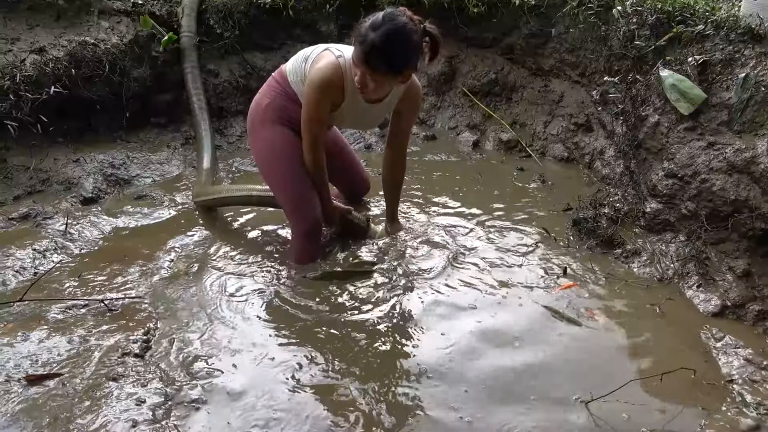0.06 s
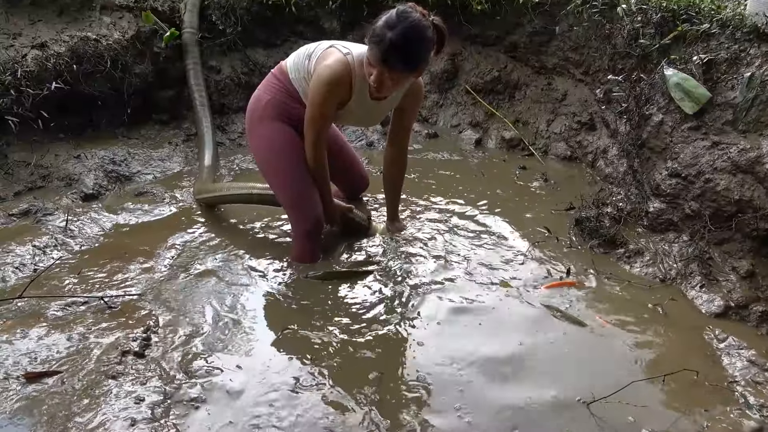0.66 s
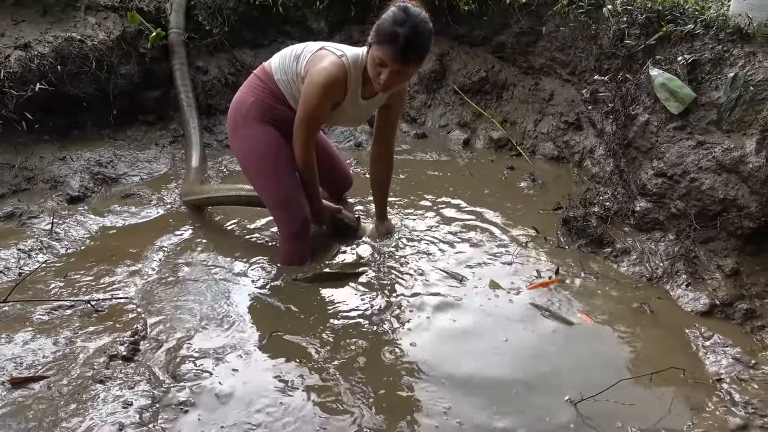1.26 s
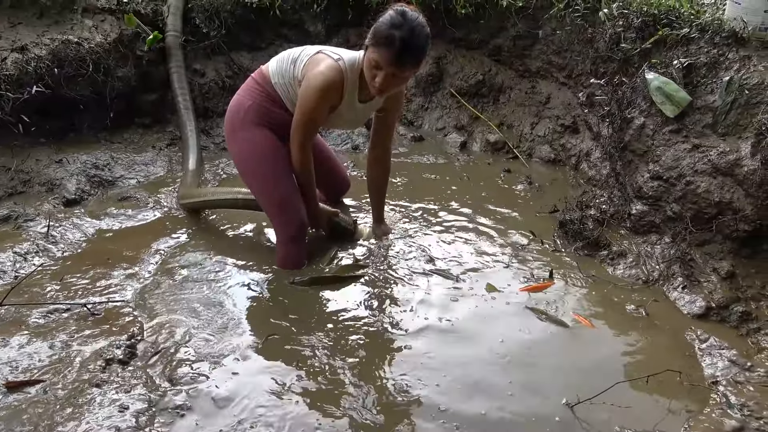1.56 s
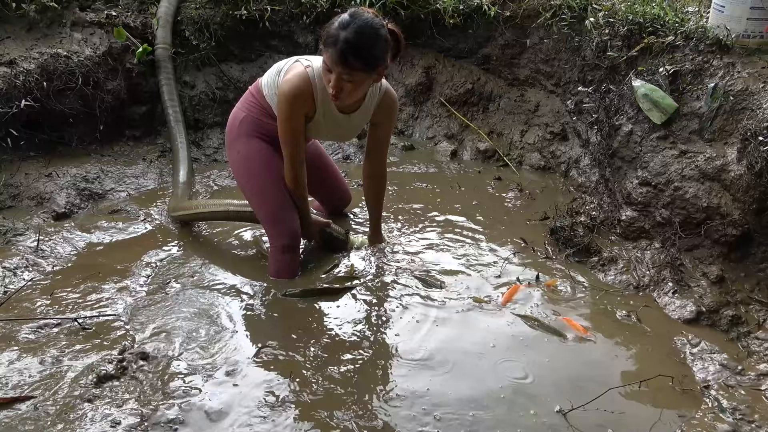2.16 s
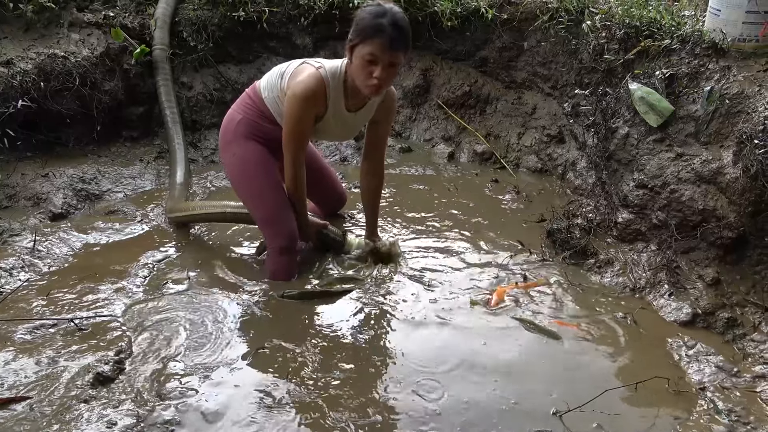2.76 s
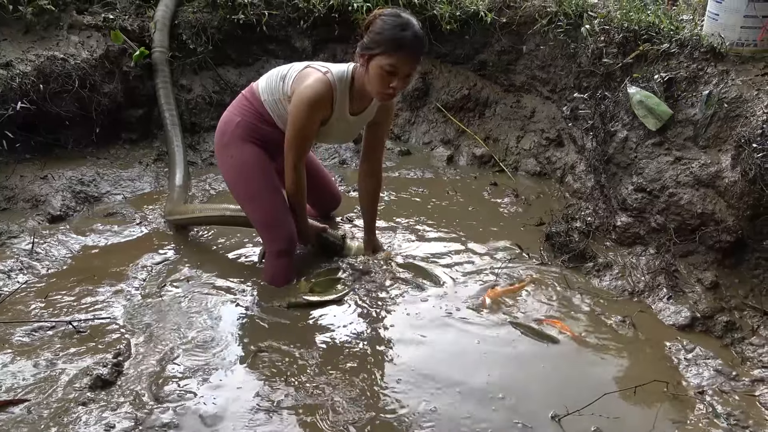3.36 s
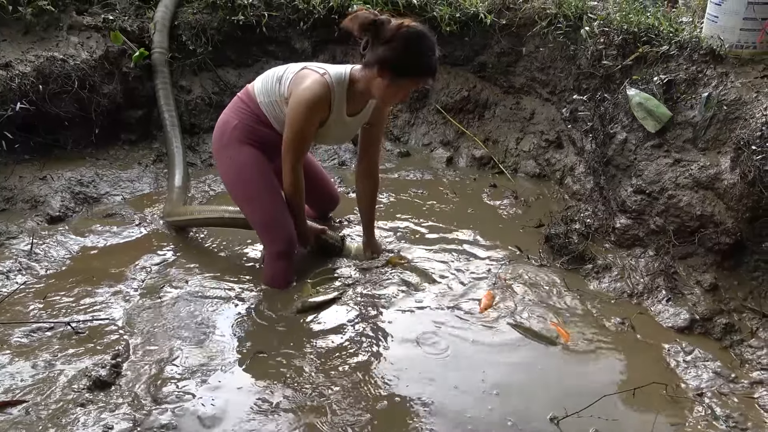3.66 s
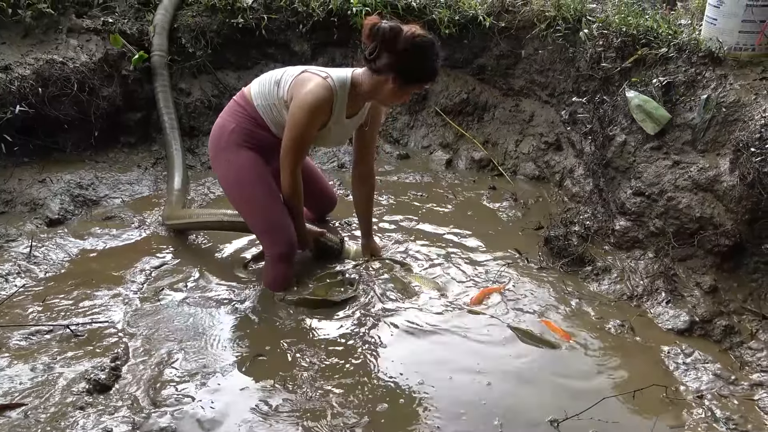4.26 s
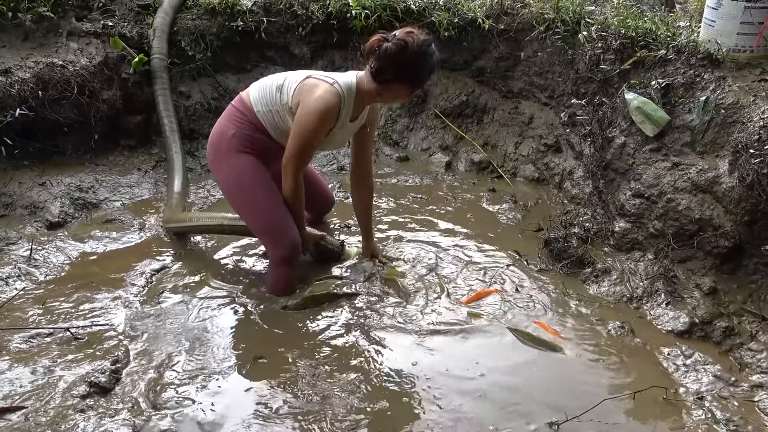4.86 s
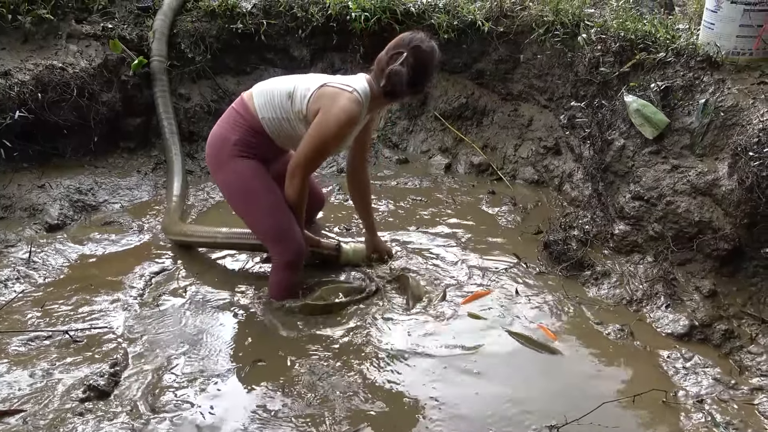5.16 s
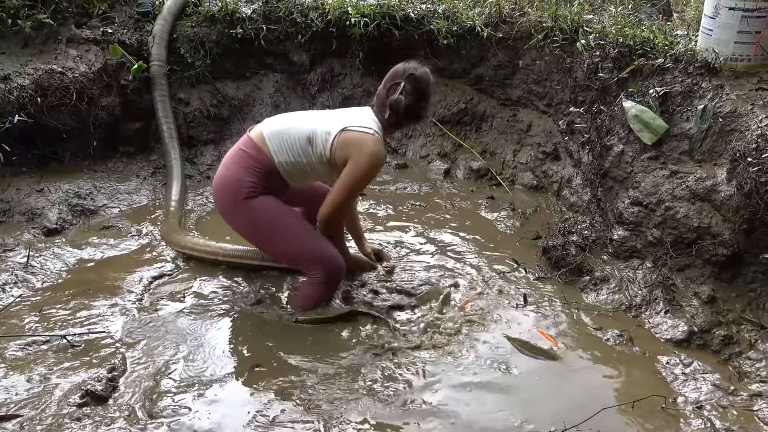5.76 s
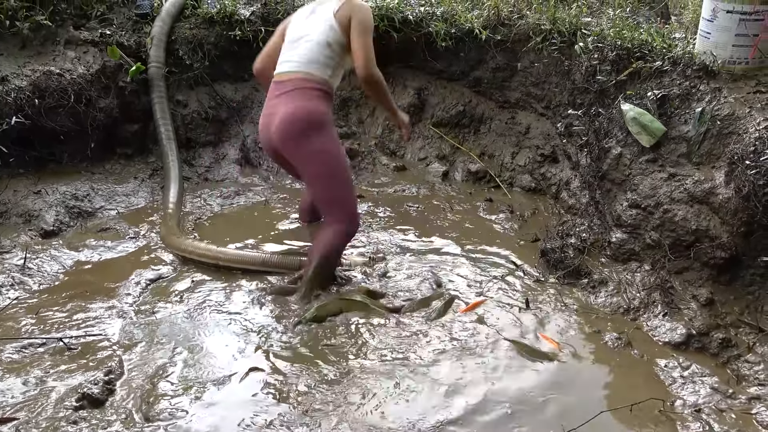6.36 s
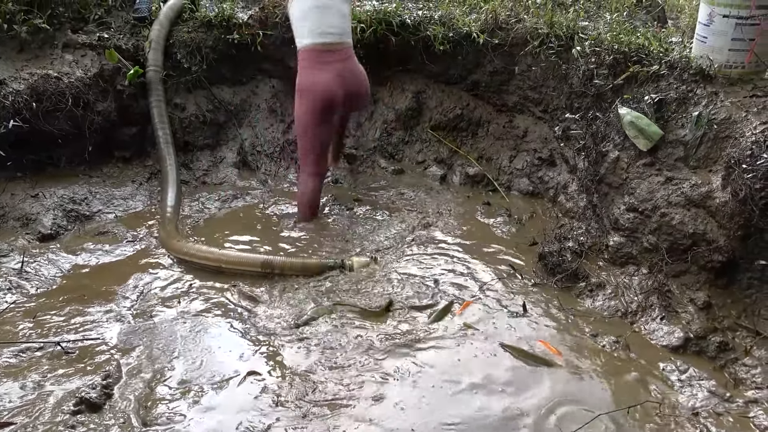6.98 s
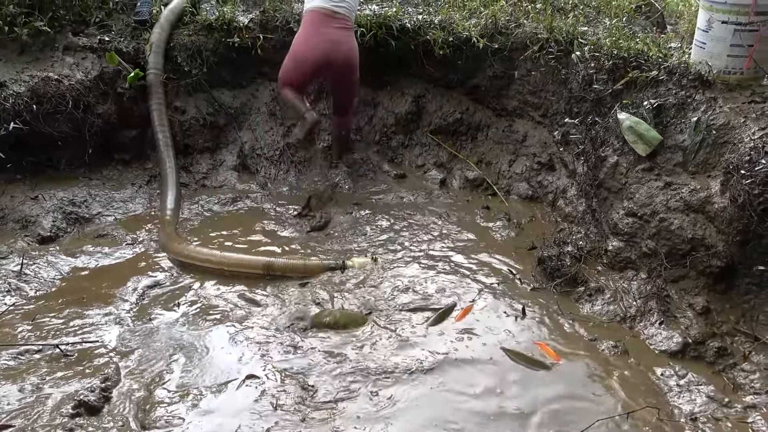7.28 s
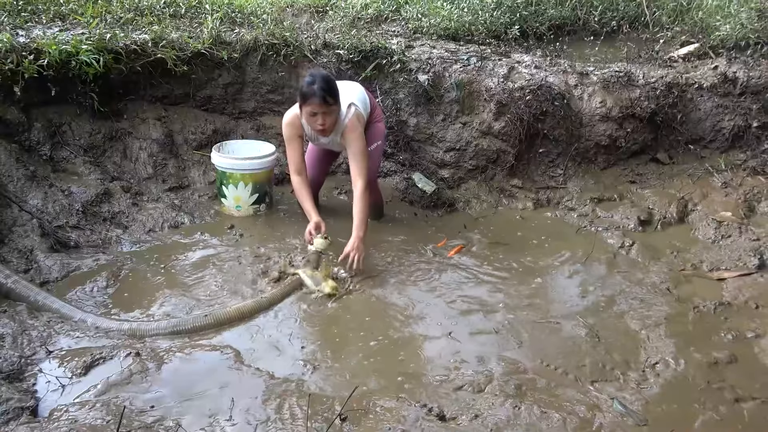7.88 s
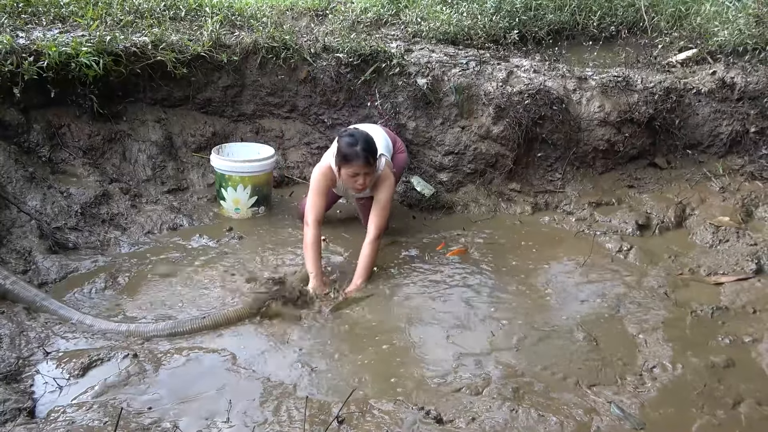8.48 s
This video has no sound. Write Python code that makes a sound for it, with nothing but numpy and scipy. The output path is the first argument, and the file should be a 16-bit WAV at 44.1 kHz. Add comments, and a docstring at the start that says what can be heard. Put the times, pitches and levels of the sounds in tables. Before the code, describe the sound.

From the start, a small single-cylinder engine driving a water pump runs steadily outdoors, heard nearby. It chugs at a fast idle, with low exhaust puffs, a knocking body, rattling metal and a sharp hiss on every beat. At about 2.2 seconds a faint, short hoot rises and falls behind it. The engine swells slightly around 5 seconds and settles, then speeds up from about 5.7 to 6.5 seconds. It stays fast, clattering harder, while the hiss becomes a more even rush. A thin, faint whine creeps in after 7 seconds. At about 7.9 seconds the engine cuts off abruptly. Faint outdoor air and a few small wet smacks follow. From about 8.3 to 8.7 seconds hands slosh in shallow muddy water, with gurgles, slaps, light spray and ringing bubbles, all quieter than the engine.

```python
"""Pump engine by a muddy pond

A small single-cylinder four-stroke drives a water pump: exhaust puffs, a knocking block, rattling metal.
It chugs slowly with a sharp hiss in every cycle, then speeds up, clatters harder, and the hiss thins
to a more even rush. A faint hoot passes behind it. The engine sound breaks off, and hands slosh in
the shallow mud with wet slaps, spray and ringing bubbles, over faint outdoor air."""
import sys
import numpy as np
from scipy import signal
from scipy.fft import rfft, irfft, next_fast_len
from scipy.io import wavfile
from scipy.ndimage import uniform_filter1d

SR = 44100
rng = np.random.default_rng(int(sys.argv[2]) if len(sys.argv) > 2 else 0)


def unload_wav(signal):
    """Save mono or channel-first audio to the path in sys.argv[1] as 16-bit WAV at rate SR, clipped to [-1, 1]."""
    wavfile.write(
        sys.argv[1],
        SR,
        np.round(np.clip(np.atleast_2d(signal).T, -1, 1) * 32767).astype(np.int16),
    )


N = 384993
T = np.arange(N) / SR
ENGINE_END_S = 7.874

# engine tone at idle and at full speed: multiple of the firing rate, relative_db
SLOW_ORDERS = [(1, -20.5), (2, -3.5), (3, -9), (4, -7), (5, -2), (6, 3.5), (7, -10.5), (8, -14.5), (9, -22),
               (10, -16), (11, -16.5), (12, -21), (13, -24), (14, -18), (15, -9), (16, -40.5), (17, -22.5),
               (18, -14.5), (19, -12), (20, -12), (21, -0.5), (22, -13), (23, -10), (24, -27), (25, -6.5),
               (26, -19)]
FAST_ORDERS = [(1, -16), (2, -4), (3, -8.5), (4, -4.5), (5, 2), (6, -11), (7, -22.5), (8, -18), (9, -16.5),
               (10, -24), (11, -10.5), (12, -12), (13, -28), (14, -9), (15, -13), (16, -14), (17, -7),
               (18, -8), (19, -12), (20, -12), (21, -25), (22, -21), (23, -18), (24, -39), (25, -50),
               (26, -29), (27, -21), (28, -9.5), (29, -22), (30, -10.5), (31, -8), (32, -8.5), (33, -11.5),
               (34, -9.5), (35, -15), (36, -16), (37, -19), (38, -17)]
# narrow ringing peaks and dips in the engine's hiss and rattle: centre_hz, width_hz, lift_db
ENGINE_RESONANCES = [(1088.6, 30, 8), (1317, 36, 6), (1686, 96, -4.5), (2027, 230, 2.5), (2410, 40, -1),
                     (2847, 29, 6), (3520, 104, 5.5), (3700, 110, -5.5), (4470, 71, 2.5), (4760, 86, 7),
                     (4834, 89, -6.5), (6030, 140, 3.5), (6650, 64, 5), (7600, 160, 4), (8480, 200, 2.5),
                     (8700, 78, 8), (10800, 550, 1.5)]
# colour of flying water: frequency_hz, gain_db
SPRAY_COLOUR = [(1200, -11), (2000, -2), (2800, -1.5), (4000, -3.5), (6000, -5), (8000, -8.5), (12000, -18),
                (15500, -27)]


def engine():
    """The turning crank times every layer; speed crossfades them from chugging to racing."""
    # idle, a brief swell, then the throttle opens: time_s, firing_rate_hz
    speed_curve = [(0, 30.593), (.403, 30.978), (1.329, 31.189), (2.338, 30.821), (2.745, 31.07),
                   (4.475, 30.601), (5.022, 32.925), (5.658, 30.888), (6.138, 40.39), (6.474, 43.37),
                   (6.875, 42.676), (7.87, 42.437)]
    speed = np.interp(T, *np.transpose(speed_curve))
    racing, rough = effort(speed)
    slow, fast = np.sqrt(1 - racing), np.sqrt(racing)
    turn = np.cumsum(speed) / SR + .0022 * drift(10)   # in cycles; no two last quite as long

    def fader(idle_db, full_db, rough_db):
        return from_db(idle_db + (full_db - idle_db) * racing + rough_db * rough)

    mix = fader(-24, -19.5, -1.5) * exhaust(turn, slow, fast) * balance(.7, -.8)
    mix += fader(-26.5, -26.5, 1) * knock(turn, slow, fast, rough) * balance(-.5, .5)
    mix += fader(-26, -21.5, -1) * rattle(turn, slow, fast)
    mix += fader(-27.5, -20, 0) * hiss(turn, slow, fast) * balance(.5, -.5)
    mix += rough * slow * growl(turn) + whine(turn)
    return mix * np.clip((ENGINE_END_S - T) * 500, 0, 1)


def effort(speed, idle_hz=31, full_hz=42.5, lag_s=.062):
    """Racing and roughness, both 0-1: the roar lags the speed, and speed changes make firing uneven."""
    racing = np.clip((speed - idle_hz) / (full_hz - idle_hz), 0, 1) ** 1.77
    pole = np.exp(-1 / (lag_s * SR))
    racing = signal.lfilter([1 - pole], [1, -pole], racing)
    change_hz_per_s = uniform_filter1d(np.abs(np.gradient(speed)) * SR, size=SR // 4)
    return racing, np.clip(.012 + .098 * np.sqrt(np.abs(change_hz_per_s)), 0, 1)


def exhaust(turn, slow, fast):
    """The low orders: one puff from the silencer per cycle."""
    chug = pulses(turn, SLOW_ORDERS[:9], place=.76)
    race = pulses(turn, FAST_ORDERS[:9], place=.68)
    puffs = slow * chug + fast * race
    levelled = puffs / np.sqrt(uniform_filter1d(puffs ** 2, size=8000))
    return levelled * from_db(.5 * drift(30))


def knock(turn, slow, fast, rough):
    """The middle orders: the block rings after each blow, with a second, higher ring at speed."""
    turn = turn + .009 * rough * slow * drift(60)
    chug = pulses(turn, SLOW_ORDERS[9:], place=.17)
    chug = signal.sosfilt(signal.butter(8, 750, fs=SR, output="sos"), chug)
    race = pulses(turn, FAST_ORDERS[9:26], place=.47)
    bark = pulses(turn, FAST_ORDERS[26:], place=.78)
    ring = from_db(1.5) * slow * chug + fast * (from_db(.5) * race + from_db(-.5) * bark)
    return ring * from_db((.5 + 2.7 * rough) * drift(45))


def rattle(turn, slow, fast):
    """The engine rattles in three noisy bursts a cycle, with metal clatter on top."""
    # rattle colour at idle and at full speed: frequency_hz, gain_db
    slow_colour = [(40, -24), (180, -2), (300, -8.5), (520, -7.5), (700, 2.5), (920, -3), (1100, -1.5),
                   (1350, 2.5), (1720, -5), (2100, -1), (3200, 0), (4500, -3.5), (12000, -15)]
    fast_colour = [(40, -20), (200, -3), (350, 1), (520, -1.5), (730, 10), (1000, -5.5), (1220, 3),
                   (1400, 4.5), (1720, 3.5), (2300, -0.5), (3200, -16), (3800, -41), (12000, -26)]
    # rattle rhythm at idle and at full speed: place_in_cycle, relative_db, decay_cycles
    slow_bursts = [(0.64, -3, 0.26), (.93, 3.5, 0.13), (0.22, -12, 0.2)]
    fast_bursts = [(0.49, -3, 0.11), (0.72, -11, 0.13), (0.041, -6.5, 0.16)]
    chug = noise(slow_colour, ENGINE_RESONANCES)
    chug *= bursts(turn, slow_bursts, rise=.02, floor_db=-7, uneven_db=4)
    race = noise(fast_colour, ENGINE_RESONANCES)
    race *= bursts(turn, fast_bursts, rise=.013, floor_db=-11, uneven_db=6)
    metal = clatter(turn)
    return (slow * (from_db(1) * chug + from_db(-4.5) * metal)
            + fast * (from_db(-7) * race + from_db(-2.5) * metal))


def clatter(turn, ring_t60_s=.063, slack_s=.00003, uneven_db=2.5):
    """Metal parts meet at set places in the cycle; each contact rings in its own way."""
    # valve gear and piston contacts: place_in_cycle, relative_db
    contacts = [(.09, 12), (0.349, 2), (.52, 2.5), (0.752, 4.5), (.81, 3), (0.932, 4.5)]
    # colour of the struck metal: frequency_hz, gain_db
    metal_colour = [(300, -22), (800, -2.5), (1100, -1.5), (1400, 5.5), (1750, -10), (2350, -0.5),
                    (3300, -13), (3900, -6.5), (6000, -14.5), (9000, -14), (15000, -33)]
    metal, age = 0, T[:SR // 20]
    for place, db in contacts:
        due = np.flatnonzero(np.diff(np.floor(turn - place)) > 0)
        late, strength = rng.standard_normal((len(due), 2)).T
        hits = np.clip(due + np.round(late * slack_s * SR).astype(int), 0, N - 1)
        clicks = np.zeros(N)
        clicks[hits] = from_db(db + uneven_db * strength)
        ring = rng.standard_normal((2, len(age))) * from_db(-60 * age / ring_t60_s)
        metal = metal + signal.oaconvolve(clicks[None], ring, axes=1)[:, :N]
    return coloured(metal, metal_colour, ENGINE_RESONANCES)


def hiss(turn, slow, fast):
    """Sharp spits of gas at idle give way to a more even rush at speed."""
    # colour of the idle jet and of the fast rush: frequency_hz, gain_db
    jet_colour = [(1500, -45), (2100, -26), (3400, -24), (3800, -12.5), (4500, 3.5), (6000, 2.5),
                  (8000, 3.5), (8800, -1), (9400, -2), (11000, -2), (13500, -6.5), (15800, -41)]
    rush_colour = [(1760, -8.5), (3000, 1), (3700, -6), (4220, -21.5), (4580, -2.5), (5090, -4), (5490, -2),
                   (6910, -2.5), (9320, -14.5), (13200, -13), (15800, -30)]
    # a sharp spit and a softer breath: place_in_cycle, relative_db, decay_cycles
    jet_bursts = [(0.651, 3.5, 0.12), (.97, -10, 0.32)]
    jet = rms_one(np.tanh(noise(jet_colour, ENGINE_RESONANCES) / 2))   # hard and dense, few stray peaks
    jet *= bursts(turn, jet_bursts, rise=.025, floor_db=-17, uneven_db=1.8)
    rush = noise(rush_colour, ENGINE_RESONANCES)
    rush *= bursts(turn, [(.69, 0, .11)], rise=.031, floor_db=-7, uneven_db=-5)
    return from_db(2.53) * slow * jet + from_db(-7) * fast * rush


def growl(turn):
    """The hollow growl of uneven firing: one throb of low noise per cycle."""
    # hollow colour: frequency_hz, gain_db
    growl_colour = [(230, -43), (340, -10), (430, 10), (520, -3), (620, 1), (850, -35)]
    hollow = from_db(-24.5) * noise(growl_colour)
    return hollow * bursts(turn, [(.8, 0, .19)], rise=.05, floor_db=-20, uneven_db=-5.5)


def whine(turn, order=74, level_db=-37.5, start_s=7.1, fade_s=.4):
    """A thin tone locked to the shaft creeps in near the end of the run."""
    fade_in = np.clip((T - start_s) / fade_s, 0, 1)
    return fade_in * from_db(level_db) * rms_one(np.sin(2 * np.pi * order * turn))


def sloshing():
    """Hands stir the shallows into gurgle and spray; between strokes the water laps and trickles."""
    # hand strokes: peak_s, gurgle_db, spray_db
    hand_strokes = [(8.265, -44, -39), (8.338, -31.5, -32), (8.408, -42, -34), (8.442, -26, -30.5),
                    (8.495, -26, -33), (8.542, -28, -41), (8.598, -34, -41), (8.622, -31, -36),
                    (8.73, -44, -31)]
    # colour of stirred water: frequency_hz, gain_db
    gurgle_colour = [(90, -45), (170, -24), (330, -11), (520, -17), (750, 2), (1000, -1), (1350, -9),
                     (1700, -2), (2000, -18), (2600, -8), (3900, -32)]
    peak_s, gurgle_db, spray_db = np.transpose(hand_strokes)
    gurgle = coloured(grains(per_s=900, spread_db=-1.5), gurgle_colour)
    spray = coloured(grains(per_s=2200, spread_db=2.5), SPRAY_COLOUR)
    return (gurgle * strokes(peak_s, gurgle_db, settle_s=.049, floor_db=-55)
            + spray * strokes(peak_s, spray_db, settle_s=.058, floor_db=-53.5))


def strokes(peaks_s, levels_db, settle_s, floor_db, swell_s=.0095):
    """Envelope of the hand strokes: each swells quickly, then the water settles."""
    power = from_db(floor_db) ** 2
    for peak_s, db in zip(peaks_s, levels_db):
        swell = np.exp(np.minimum(T - peak_s, 0) / swell_s)
        settle = np.exp(-np.maximum(T - peak_s, 0) / settle_s)
        power = power + (from_db(db) * swell * settle) ** 2
    return np.sqrt(power)


def bubbles(ring_cycles=25, swell_s=.0015):
    """Trapped air rings; a bubble that climbs to the surface rises in pitch and rings longer."""
    # the larger bubbles: start_s, relative_db, pitch_hz, rise as a share of the pitch
    plops = [(7.96, -30, 1300, 1.0), (8.33, -17, 710, .11), (8.361, -15.5, 1730, .1),
             (8.408, -19, 2930, .1), (8.438, -8.5, 1110, 0.054), (8.474, -13, 1020, .05),
             (8.481, -8, 943, .05), (8.487, -11, 990, .1), (8.498, -21.5, 340, .02), (8.511, -18, 826, .1),
             (8.516, -16.5, 2750, .1), (8.534, -12, 780, .05), (8.619, -14.5, 770, 0.043),
             (8.649, -23, 3200, .05)]
    track, age = np.zeros(N + SR), T[:SR // 10]
    for start_s, db, pitch_hz, rise in plops:
        life = age * pitch_hz / (ring_cycles * (1 + 4 * rise))
        glide_hz = pitch_hz * (1 + rise * (2 * np.minimum(life, 1) - .4))
        envelope = from_db(-60 * life) * (1 - np.exp(-(age / swell_s) ** 2))
        ring = np.sin(2 * np.pi * np.cumsum(glide_hz) / SR) * envelope
        track[round(start_s * SR):][:len(age)] += from_db(db) * ring / np.abs(ring).max()
    return track[:N]


def slaps(crack_s=.0016, tail_s=.015, tail_db=-8.5):
    """Wet mud smacks: a short crack with a tail of spray."""
    # smacks on the mud: start_s, relative_db
    smacks = [(7.8843, -17), (8.0182, -19), (8.1566, -23), (8.317, -22), (8.336, -15.5), (8.3444, -23),
              (8.364, -14.5), (8.4285, -19), (8.441, -16), (8.55, -24), (8.7254, -18)]
    envelope, age = np.zeros(N + SR), T[:SR // 8]
    smack = np.exp(-age / crack_s) + from_db(tail_db) * np.exp(-age / tail_s)
    for start_s, db in smacks:
        envelope[round(start_s * SR):][:len(age)] += from_db(db) * smack
    return envelope[:N] * noise(SPRAY_COLOUR)


def hoot(start_s=2.18, length_s=.3, low_hz=213, top_hz=291, level_db=-38.5):
    """A faint, nearly pure tone with a weak octave; pitch and level follow one arch."""
    arch = np.sin(np.pi * np.clip((T - start_s) / length_s, 0, 1))
    phase = 2 * np.pi * np.cumsum(low_hz + (top_hz - low_hz) * arch) / SR
    return from_db(level_db) * arch * rms_one(np.sin(phase) + from_db(-9) * np.sin(2 * phase))


def outdoor_air(level_db=-42):
    """A faint, steady bed of open air."""
    # colour of the air: frequency_hz, gain_db
    air_colour = [(18, -44), (30, -13), (129, 2.5), (328, 1), (859, 2.5), (1370, -3.5), (4200, -7.5),
                  (4900, -9), (7630, -9.5), (15000, -28)]
    return from_db(level_db) * noise(air_colour)


def pulses(turn, orders, place, size=2048):
    """One pulse per cycle that rings with the given orders, starting at a place (0-1) in the cycle."""
    multiples, db = np.transpose(orders)
    bins = np.round(multiples).astype(int)
    log_gain = np.full(size // 2 + 1, np.log(from_db(db.max() - 36)))
    log_gain[bins] = np.log(from_db(db))
    spectrum = np.exp(rfft(2 * irfft(log_gain)[:size // 2], size))   # minimum phase: attack, then decay
    shape = rms_one(irfft(spectrum * np.isin(np.arange(len(spectrum)), bins)))
    return np.interp((turn - place) % 1, np.arange(size) / size, shape)


def bursts(turn, rhythm, rise, floor_db, uneven_db):
    """Envelope of bursts, each with its own strength; rise and decay are in cycles."""
    power = from_db(floor_db) ** 2
    for place, db, decay in rhythm:
        cycle, age = np.divmod(turn - place + 2, 1)
        strength = from_db(db + uneven_db * rng.uniform(-1, 1, 400))[cycle.astype(int)]
        attack = 1 - np.exp(-(age / rise) ** 2)
        power = power + (strength * attack * np.exp(-age / decay)) ** 2
    return rms_one(np.sqrt(power))


def grains(per_s, spread_db):
    """Tiny random collapses of varied size in the water, as mid and side."""
    sizes = from_db(spread_db * np.minimum(rng.exponential(1, N), 4))
    hits = rng.random(N) < per_s / SR
    return sizes * hits * rng.standard_normal((2, N))


def noise(colour, resonances=()):
    """Steady stereo noise of one colour."""
    return coloured(rng.standard_normal((2, N)), colour, resonances)


def coloured(mid_side, colour, resonances=()):
    """Shape mid and side by a colour and its resonances; gives left and right at unit power."""
    # stereo width: frequency_hz, side_to_mid_db
    stereo_width = [(60, -26), (500, -9.5), (1100, -19.5), (2200, -50), (3500, -75), (5500, -14.5),
                    (8000, -11), (16000, -9)]
    size = next_fast_len(N, True)
    hz = np.maximum(np.arange(size // 2 + 1) * SR / size, 1)
    gain = at_hz(colour, hz)
    for centre_hz, width_hz, lift_db in resonances:
        gain *= from_db(lift_db / (1 + (2 * (hz - centre_hz) / width_hz) ** 2))
    spectra = rfft(mid_side, size) * [gain, gain * at_hz(stereo_width, hz)]
    mid, side = irfft(spectra, size)[:, :N]
    return rms_one(np.array([mid + side, mid - side]))


def at_hz(curve, hz):
    """Gain of an EQ curve on a log-frequency axis."""
    points_hz, db = np.transpose(curve)
    return from_db(np.interp(np.log(hz), np.log(points_hz), db))


def drift(rate_hz):
    """Random wander at unit power, changing course about rate_hz times a second."""
    return rms_one(np.interp(T * rate_hz, np.arange(4000), rng.standard_normal(4000)))


def balance(left_db, right_db):
    """Gains for the two channels."""
    return from_db([[left_db], [right_db]])


def from_db(db):
    """Decibels to gain."""
    return 10 ** (np.asarray(db) / 20)


def rms_one(x):
    """Scale to unit power."""
    return x / np.sqrt(np.mean(x ** 2) + 1e-20)


def scene():
    """The engine and the hoot, then a hard cut to hands in the pond."""
    pump = engine()
    pond = sloshing() + from_db(-5.5) * bubbles() + from_db(-8.5) * slaps() + outdoor_air()
    return pump + hoot() + (T > ENGINE_END_S) * pond


def record(dry):
    """A steep low-pass takes off the very top."""
    cutoff_hz = 15850
    return signal.sosfilt(signal.ellip(12, .1, 90, cutoff_hz, fs=SR, output="sos"), dry)


dry = scene()
out = record(dry)
unload_wav(out)
```